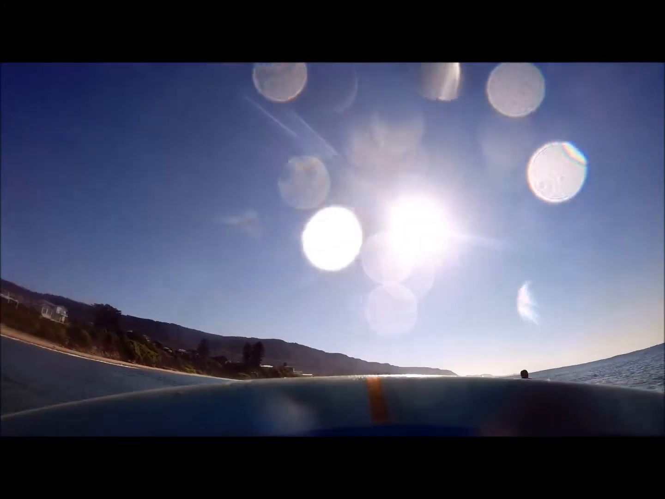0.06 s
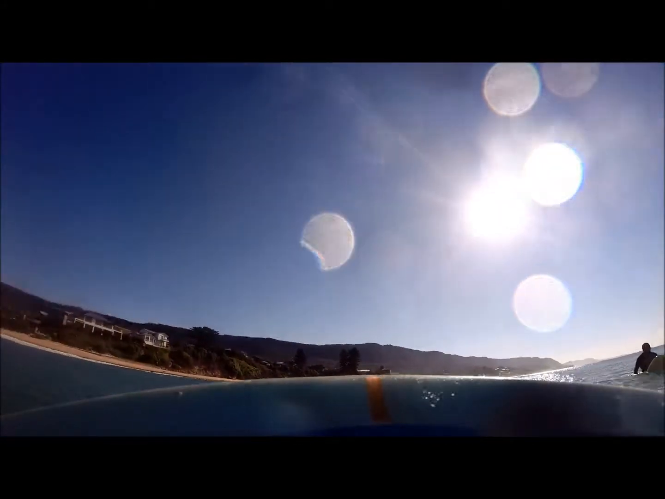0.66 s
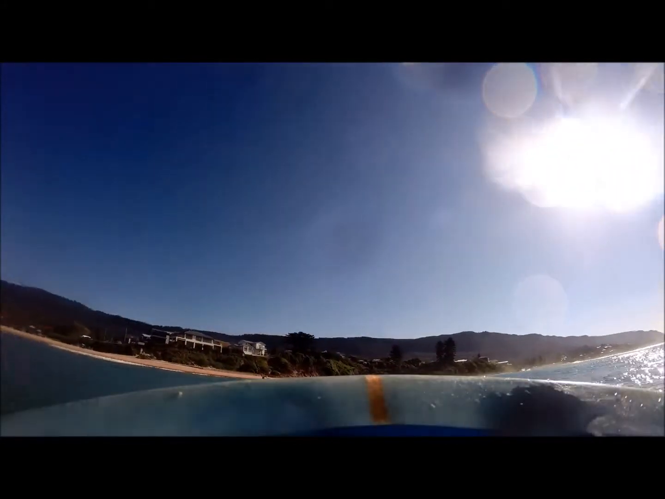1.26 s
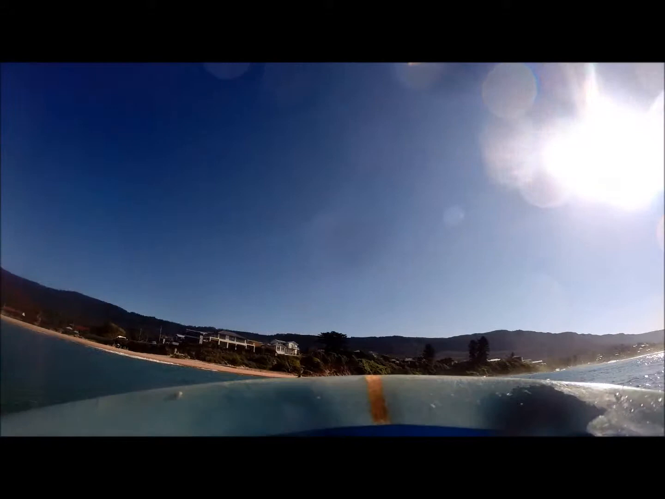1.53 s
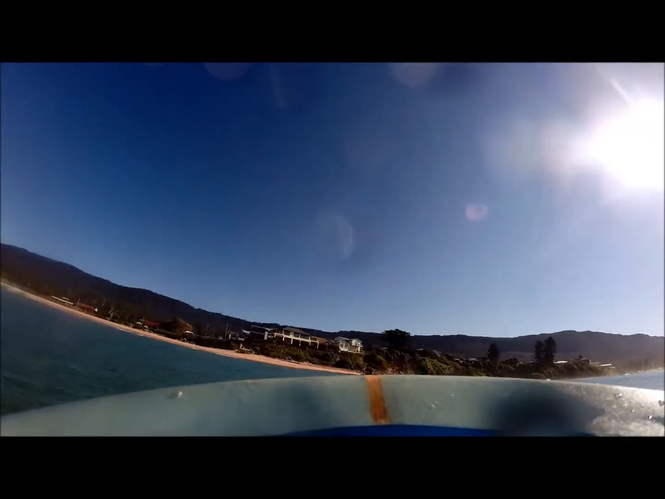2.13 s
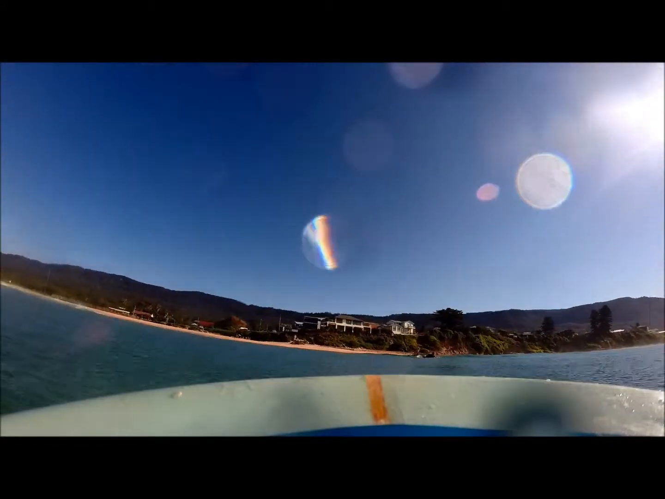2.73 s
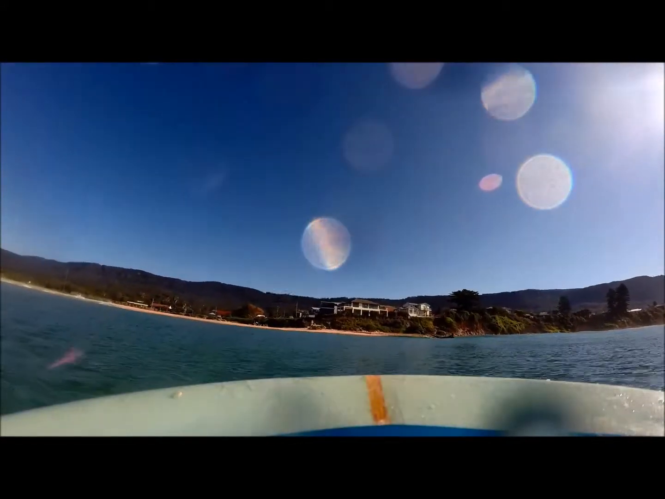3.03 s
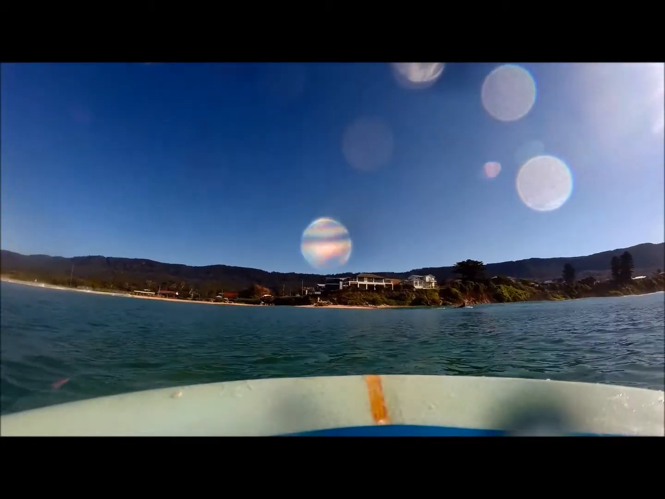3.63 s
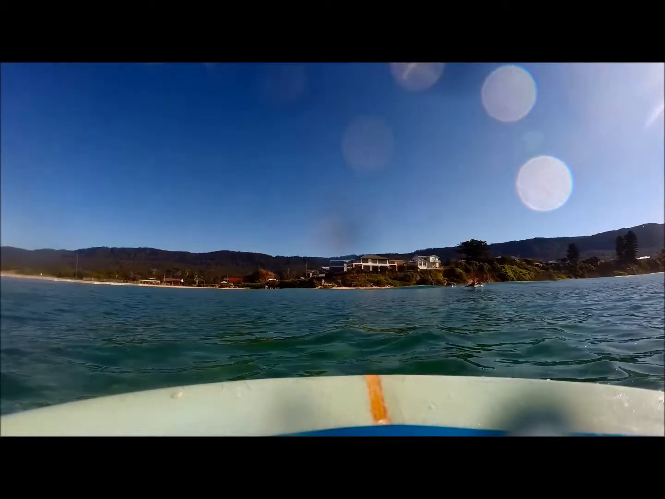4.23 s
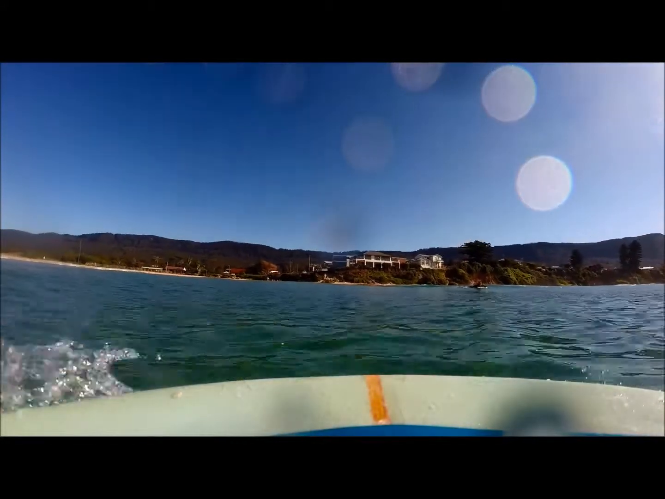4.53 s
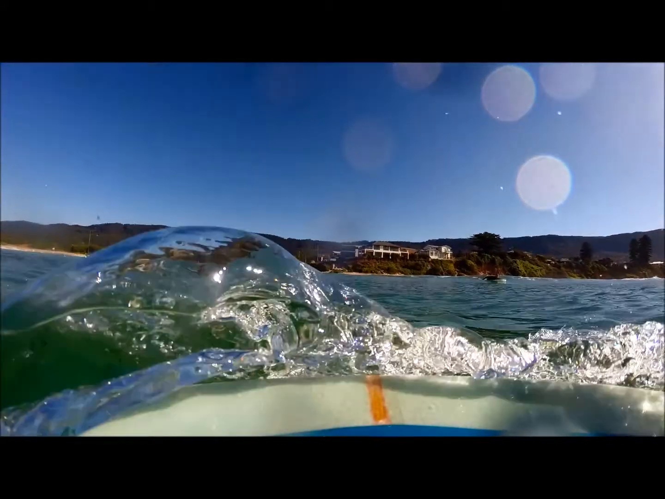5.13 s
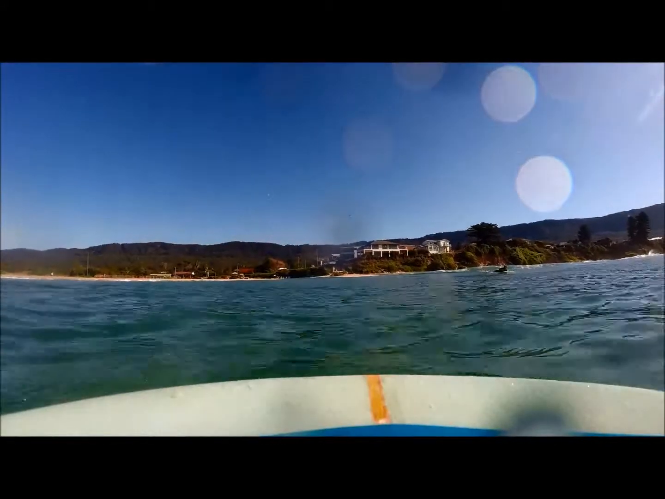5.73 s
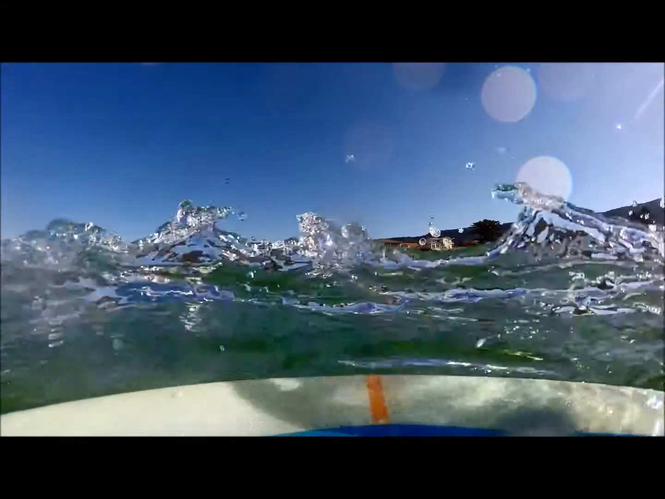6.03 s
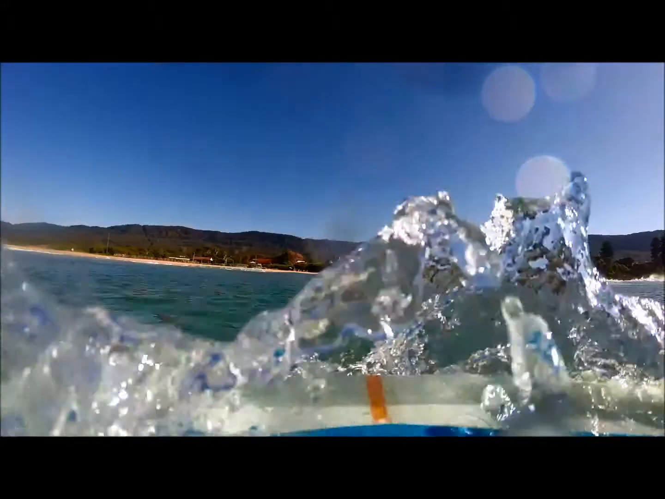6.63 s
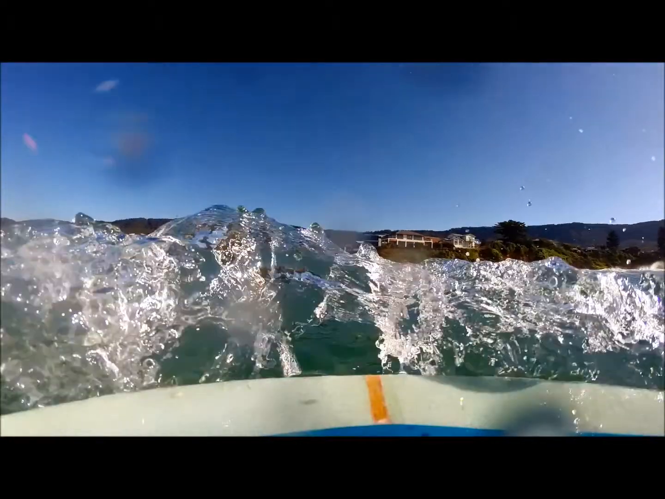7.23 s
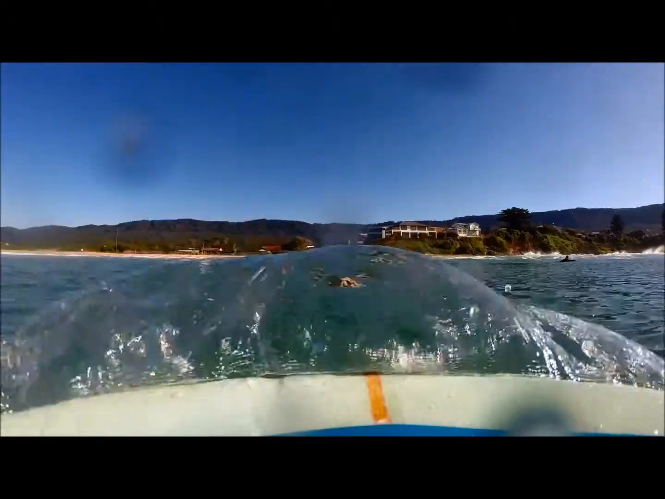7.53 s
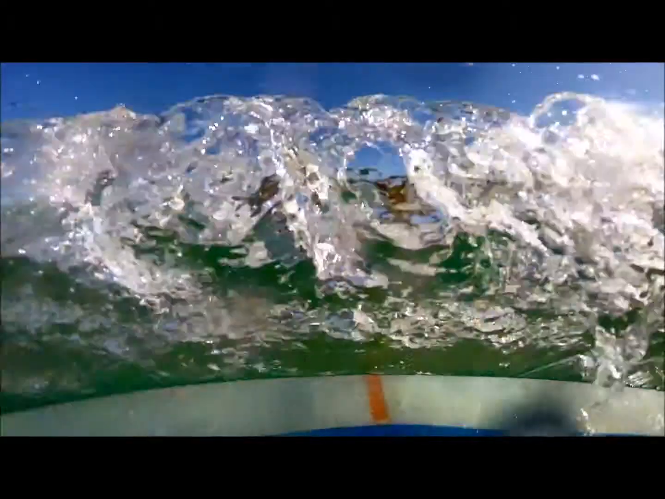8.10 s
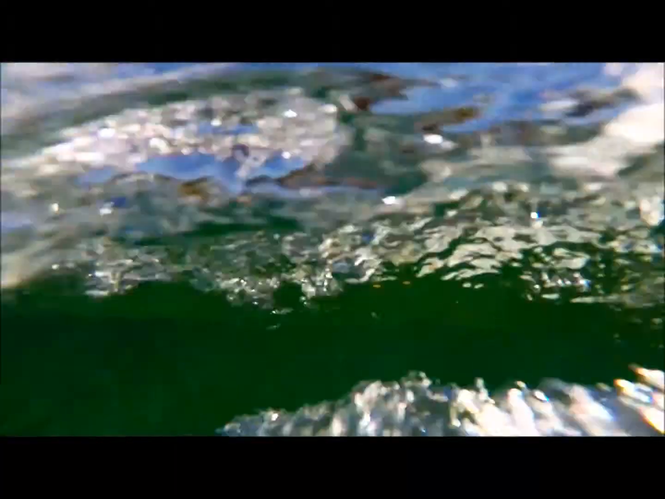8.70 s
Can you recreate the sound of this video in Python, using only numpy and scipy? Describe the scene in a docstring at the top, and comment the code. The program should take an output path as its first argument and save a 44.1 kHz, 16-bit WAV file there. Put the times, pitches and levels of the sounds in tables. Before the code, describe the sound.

Muffled sloshing, plops and plinking drops around a surfboard, with low shuddering underneath and a final fizzing wave.

```python
"""Choppy sea water slaps and gurgles against a paddled surfboard, heard by a camera on the board's nose.
Each wave builds, holds and drains. The air it traps rings as bubbles: big ones gurgle and plop,
small ones plink in the spray, all muffled by the camera's waterproof housing.
Underneath, the board and the camera mount shudder with a deep rumble as they ride over a small swell.
Near the end a wave smacks the housing and washes over it, fizzing."""
import sys
import numpy as np
from scipy import signal
from scipy.fft import rfft, irfft
from scipy.io import wavfile
from scipy.ndimage import uniform_filter1d, minimum_filter1d

SR = 44100
rng = np.random.default_rng(int(sys.argv[2]) if len(sys.argv) > 2 else 0)


def generate_wav(signal):
    """Clip the signal to [-1, 1] and save it as 16-bit WAV at the path in sys.argv[1]."""
    frames = np.transpose(np.atleast_2d(signal))
    scaled = np.clip(frames, -1, 1) * 32767
    pcm = np.round(scaled).astype(np.int16)
    wavfile.write(sys.argv[1], SR, pcm)


N = 386316

# In the tables, t is the time, f the frequency, and ring the time a sound takes to fade by 60 dB.
# pitch at which board and mount flex: t/s, f/Hz
SHUDDER_PITCH = [(0.0, 43.25), (2.5, 41.5), (2.9, 45), (5.81, 44.26), (6.78, 38.55), (7.12, 42.1)]
# steady shaking of board and mount: t/s, level/dB
SHAKING = [(0, -32.5), (.65, -27), (1.2, -29), (1.3, -40.5), (1.8, -35), (2.3, -29.5), (2.5, -15.5),
           (3, -22), (4.28, -23), (4.45, -35.5), (5, -25.5), (6.2, -22.5), (7.45, -24), (8.4, -20.5),
           (8.76, -28)]
# bumps that set the board swinging: t/s, hold/s, level/dB
JOLTS = [(0.499, 0.06, -21.5), (2.627, 0.052, -10.5), (2.741, 0.13, -7), (3.427, 0.025, -10.5),
         (3.538, 0.05, -16), (3.841, 0.087, -20), (4.708, 0.045, -17), (5.153, 0.098, -20),
         (5.49, 0.03, -12), (5.663, 0.044, -14.5), (5.887, 0.045, -12), (6.046, 0.013, -13.5),
         (6.61, 0.038, -11.5), (6.806, 0.033, -13.5), (7.176, 0.037, -9.5), (7.588, 0.021, -16.5),
         (7.759, 0.04, -11.5), (7.877, 0.017, -12), (8.247, 0.03, -14)]
# faint clicks during the strongest rumble: t/s
CLICK_TIMES = [2.741, 2.753, 2.777, 2.793, 2.805, 2.826, 2.839, 2.848, 2.861, 2.9]

# tone of each sound, meaning how strong its low and high parts are: f/Hz, relative level/dB
BUFFET_TONE = [(10, -14.5), (22, -0.5), (36, 4), (58, 3.5), (78, -3.5), (110, -29), (500, -120)]  # wind and chop pushing on the board
CLICK_TONE = [(500, -4), (2000, 0), (4500, -17), (7000, -50)]
THUD_TONE = [(35, -15), (60, 1), (100, -3.5), (165, -4), (230, -27), (1200, -120)]
GURGLE_TONE = [(110, -32.5), (185, 0), (210, 0.5), (263, -7), (339, -2.5), (430, -8), (560, -25),
               (950, -120)]
SPLASH_TONE = [(320, -22.5), (540, -1), (830, 1.5), (924, -5), (1010, -4), (1180, -7), (1360, -6.5),
               (1450, -16.5), (1880, -29.5), (3190, -120)]
DROPLET_TONE = [(920, -35), (1560, -2), (1650, -2.5), (1770, -11), (1960, -11), (2150, -7.5), (2250, -7.5),
                (2600, -18.5), (2760, -19), (2950, -15), (3430, -27), (3750, -29.5), (4880, -56.5),
                (8250, -120)]
FIZZ_TONE = [(2180, -38.5), (3700, -3), (4150, -12), (4910, -8), (5710, -16), (6700, -18), (7500, -29),
             (9750, -54.5), (16500, -120)]
ON_HOUSING_TONE = [(1060, -42), (1800, 15), (2040, -5.5), (3010, 2.5), (3730, -10.5), (4080, -12.5),
                   (6540, -24), (7500, -25), (9750, -75.5), (16500, -120)]  # water right on the housing

# restless sea between the waves: t/s, chop level/dB, droplet level/dB, fizz level/dB
RESTLESS_SEA = [(0, -52.5, -63.5, -78), (1.2, -42, -59.5, -75.5), (2.4, -43.5, -60.5, -75.5),
                (2.9, -41, -61, -86.5), (3.7, -40, -58, -82.5), (4.9, -37, -55.5, -76),
                (5.35, -39.5, -50, -71), (6.25, -41.5, -56.5, -74), (6.7, -35, -43, -68),
                (7.6, -36, -48, -70.5), (8.3, -42.5, -47.5, -68.5), (8.76, -32, -45, -45.5)]
# handfuls of water landing nearby: t/s, hold/s, droplet level/dB, fizz level/dB
SPATTERS = [(0.128, 0.021, -53.5, -80), (0.697, 0.25, -62, -72), (1.913, 0.011, -43, -72),
            (2.224, 0.0087, -44.5, -74), (2.44, 0.038, -44, -73), (2.532, 0.016, -41, -72.5),
            (3.166, 0.017, -53, -67), (4.029, 0.016, -46, -84), (4.244, 0.022, -44, -60),
            (4.65, 0.013, -36, -59), (4.935, 0.025, -47.5, -68), (5.63, 0.023, -34.5, -51),
            (5.871, 0.022, -50, -57), (6.508, 0.031, -36.5, -54), (6.95, 0.05, -42, -50.5)]
# single drops hitting the housing: t/s, level/dB, f/Hz
DROP_TICKS = [(3.801, -29, 1640), (4.035, -33.5, 1640), (4.559, -45, 4630), (5.318, -39, 3800),
              (5.403, -35, 1980), (5.4937, -35.5, 4800), (5.534, -29.5, 2940), (5.6, -25, 2240),
              (5.625, -22, 2230), (5.6466, -31, 3600), (5.663, -29, 6550), (5.8815, -40, 4930),
              (5.936, -29, 2070), (6.0278, -39, 4330), (6.517, -23, 2240), (6.5314, -30, 3200),
              (6.692, -27.5, 2240), (6.7567, -24.5, 2190), (6.9009, -21, 2330), (6.912, -25.5, 3020),
              (6.971, -15.5, 2130), (6.997, -22, 2930), (7.046, -18.5, 1600), (7.1244, -22, 2360),
              (7.172, -20.5, 2160), (7.356, -31.5, 2500), (7.6437, -30.5, 3056), (7.7425, -24, 2240),
              (7.761, -21.5, 2240), (7.793, -27.5, 3070), (7.841, -27.5, 3080), (7.9401, -18, 1600),
              (7.9884, -16.5, 1620), (7.995, -25, 2160), (8.062, -29.5, 2330)]
# water sliding along the board's edge over a shrinking hollow: t/s, length/s, first f/Hz, last f/Hz,
# level/dB
SLURPS = [(0.575, 0.16, 498, 715, -32), (0.693, 0.27, 200, 362.4, -31.5), (3.248, .14, 468, 590, -25),
          (7.408, 0.074, 197, 227, -21)]
# small waves lapping against the board; the last three rows are the splash of the wave smacking the housing:
# t/s, level/dB, ring/s
LAPS = [(0.125, -35, 0.1), (0.468, -37.5, 0.22), (1.444, -39.5, 0.24), (1.623, -40.5, 0.29),
        (1.887, -38, 0.19), (1.982, -30, 0.088), (2.047, -31.5, 0.22), (2.133, -29.5, 0.16),
        (2.292, -26, 0.29), (2.427, -19, 0.3), (2.541, -18, 0.13), (4.06, -21.5, 0.05), (4.185, -25, 0.43),
        (4.343, -24, 0.11), (4.557, -24, 0.12), (4.634, -21, 0.055), (5.461, -28, 0.19),
        (6.685, -29.5, 0.13), (8.106, -22.5, 0.078), (8.4825, -12, .025), (8.505, -31, .022),
        (8.744, -22.5, 0.055)]
# pockets of air trapped by slaps and falling drops: t/s, level/dB, f/Hz, ring/s
AIR_POCKETS = [(1.484, -24.5, 220, 0.22), (1.7875, -23.5, 368, 0.044), (1.89, -21, 864, 0.22),
               (2.137, -22, 1323, .09), (2.3431, -10.5, 204, 0.018), (2.864, -24, 774, 0.042),
               (3.2047, -18.5, 227, 0.18), (3.5176, -10, 205, 0.17), (3.575, -13, 907, 0.055),
               (4.0643, -10, 714, 0.12), (4.3475, -7.5, 867, 0.031), (4.558, -17, 396, 0.16),
               (4.56, -17, 1265, 0.079), (4.6378, -6, 750, 0.028), (4.658, -7.5, 1003, 0.054),
               (4.7489, -10, 315, 0.12), (5.0743, -20.5, 681, 0.086), (5.233, -15.5, 870, 0.055),
               (5.36, -16, 357, 0.094), (5.378, -14, 741, 0.061), (5.4732, -4.5, 386, 0.027),
               (5.4843, -11, 682, 0.098), (5.53, -8.5, 1096, 0.024), (5.6966, -13.5, 860, 0.027),
               (5.7225, -14, 254, 0.045), (5.7716, -4.5, 1120, 0.025), (5.8855, -9, 966, 0.041),
               (5.938, -8, 1064, 0.029), (6.683, -14.5, 323, 0.058), (6.827, -9.5, 1213, 0.03),
               (6.9699, -3.5, 870, 0.018), (7.089, -13, 306, 0.15), (7.133, -6.5, 292, 0.093),
               (7.1392, -6.5, 734, 0.063), (7.527, -15, 747, 0.062), (7.7555, -9, 726, 0.0224),
               (7.9057, -5, 825, 0.057), (7.956, -5.5, 1320, 0.033), (8.1063, -9.5, 810, 0.074),
               (8.3454, -15, 334, 0.23), (8.4228, -10, 280, 0.091), (8.483, 1, 703, 0.022),
               (8.506, -1.5, 850, 0.01), (8.5666, -13, 820, 0.024), (8.577, -11.5, 333, 0.031),
               (8.6172, -3.5, 1220, 0.02), (8.625, -7, 1018, 0.057)]
# a wave hitting the housing itself: t/s, level/dB
SMACKS = [(8.4824, -11.5), (8.505, -30.5)]
# notes the housing rings with when hit: f/Hz, relative level/dB, ring/s
HOUSING_NOTES = [(1665, 3.5, 0.026), (2275, 18, 0.0072), (3540, 3, 0.0082)]
# how bright the splashes are: t/s, brightness (higher means more treble and less bass)
BRIGHTNESS = [(0, 1), (2.2, 0.5), (2.45, -5), (3.2, 1.5), (3.6, 5), (5.5, 5), (7, 7.5), (8.4, 12.5),
              (8.6, 31)]
# the swell punching the underside of the board: t/s, hold/s, level/dB
THUMPS = [(2.53, 0.064, -22), (3.1, 0.028, -34), (4.655, 0.035, -25), (5.474, 0.012, -25.5),
          (6.655, 0.035, -27), (7.933, 0.017, -20), (8.522, 0.04, -28)]
# waves surging against the board: crest t/s, rise/s, hold/s, fall/s, gurgle level/dB, splash level/dB,
# droplet level/dB
WAVES = [(0.0, .1, 0.025, 0.89, -34, -34, -57.5), (0.515, 0.09, 0.23, 0.18, -33.5, -38.5, -65),
         (0.814, 0.13, 0.22, 0.072, -32.5, -34.5, -56), (1.535, 0.035, 0.04, 0.36, -37, -46, -59.5),
         (1.978, 0.3, 0.34, 0.23, -32.5, -38.5, -69), (2.34, 0.072, 0.056, .1, -24.5, -32.5, -50.5),
         (2.433, 0.036, 0.049, 0.018, -15.5, -14.5, -44), (2.525, 0.025, 0.031, 0.042, -15.5, -22, -51),
         (2.614, 0.054, 0.19, 0.099, -25, -32.5, -61), (3.126, 0.036, 0.4, .15, -31.5, -35, -64),
         (3.511, 0.28, 0.056, 0.084, -23.5, -22.5, -44), (3.81, 0.083, 0.023, 0.15, -30, -31.5, -56),
         (4.075, 0.085, 0.22, 0.14, -29.5, -27.5, -49), (4.23, 0.096, 0.051, 0.26, -23, -24.5, -49),
         (4.579, 0.037, 0.032, 0.13, -27.5, -32, -50), (4.651, 0.053, 0.12, 0.049, -23.5, -25, -49),
         (5.472, 0.13, 0.053, 0.57, -28, -30.5, -42.5), (5.775, 0.12, 0.022, 0.11, -17, -19.5, -40.5),
         (5.895, 0.078, 0.066, 0.12, -22.5, -19, -37), (6.694, 0.019, 0.18, 0.12, -24.5, -30, -51),
         (6.934, 0.11, 0.13, 0.14, -26, -21, -33.5), (7.108, 0.15, 0.069, 0.081, -20, -17, -35),
         (7.27, 0.25, 0.059, 0.15, -26.5, -31, -45.5), (7.857, 0.17, 0.021, 0.31, -23, -17.5, -32.5),
         (7.936, 0.034, 0.045, 0.15, -17.5, -16, -42), (8.07, 0.083, 0.045, 0.1, -22.5, -22.5, -36),
         (8.407, 0.11, 0.17, 0.078, -27, -33.5, -38.5), (8.757, 0.054, .02, 0.13, -27, -30, -25.5)]


def gain_of(db):
    """Turns decibels into a number to multiply a sound by."""
    return 10 ** (np.asarray(db) / 20)


def unit_level(x):
    """Scales a signal so that its average strength (rms) is 1."""
    return x / np.sqrt(np.mean(x ** 2) + 1e-20)


def curves(rows):
    """Joins the points of a time table with straight lines, giving one curve per column."""
    times, *columns = np.transpose(rows)
    return [np.interp(np.arange(N) / SR, times, column) for column in columns]


def add(mix, start, sound):
    """Mixes a sound in, beginning at start seconds."""
    part = mix[max(round(start * SR), 0):][:len(sound)]
    part += sound[:len(part)]


def coloured(x, tone):
    """Gives a sound a tone and an rms of 1. The filter never rings ahead of a hit, so hits stay sharp."""
    hz, db = np.transpose(tone)
    log_hz = np.log(abs(np.fft.fftfreq(4096, 1 / SR)) + 1)
    log_gain = np.log(gain_of(np.interp(log_hz, np.log(hz), np.maximum(db, -120))))
    taps = np.fft.ifft(np.exp(np.conj(signal.hilbert(log_gain)))).real
    return unit_level(signal.oaconvolve(x, taps[:len(taps) // 2])[:N])


def noise(tone):
    """A rushing noise with the given tone."""
    return coloured(rng.standard_normal(N), tone)


def wander(hz):
    """A random drift of rms 1, about as fast as hz."""
    t = np.arange(N) / SR
    coarse_t = np.arange(0, t[-1] + 1, 1 / 1000)
    f = np.fft.rfftfreq(len(coarse_t), coarse_t[1])
    spectrum = rfft(rng.standard_normal(len(coarse_t))) * np.exp(-(f / hz) ** 2)
    return unit_level(np.interp(t, coarse_t, irfft(spectrum, len(coarse_t))))


def steadied(x, window):
    """Evens out loudness changes slower than window samples and keeps the fine grain."""
    power = uniform_filter1d(uniform_filter1d(abs(x) ** 2, window), window)
    return x / np.sqrt(abs(power) + 1e-9)


def swells(floor_db, events):
    """Level in dB of events (t/s, rise/s, hold/s, fall/s, level/dB) over a floor; slopes span 20 dB."""
    t = np.arange(0, N, 32) / SR
    power = 0
    for crest, rise, hold, fall, db in events:
        drop_db = 20 * (np.maximum(crest - t, 0) / rise + np.maximum(t - crest - hold, 0) / fall)
        power += gain_of(db - drop_db) ** 2
    return 10 * np.log10(gain_of(floor_db) ** 2 + np.interp(np.arange(N) / SR, t, power))


def bubble(hz, ring_s, rise):
    """A pocket of air starts ringing within one cycle and climbs in pitch as it nears the surface."""
    t = np.arange(int(1.2 * ring_s * SR) + 8) / SR
    swing = (1 - np.exp(-(2 * t * hz) ** 2)) * gain_of(-60 * t / ring_s)
    return swing / swing.max() * np.sin(2 * np.pi * hz * (t + rise * t * t / (2 * ring_s)))


def froth(tone, low_hz, high_hz, per_s, cycles, spread_db, rush_db, churn_db, churn_hz, window):
    """Bubbles of many sizes ring over the rush of the water; churning makes the level flutter."""
    swarm, sizes = np.zeros(N), 32
    for hz in np.geomspace(low_hz, high_hz, sizes):
        when, strength, chance = rng.random((3, 1000))
        gains = hz * gain_of(spread_db * np.minimum(-np.log(1 - strength), 4))  # a few are much louder
        born = chance < per_s * N / SR / sizes / len(chance)
        ring = bubble(hz, cycles / hz * rng.uniform(0.39, 2.15), rise=0.12)
        for start, gain in zip(when[born] * N / SR, gains[born]):
            add(swarm, start, gain * ring)
    water = unit_level(swarm) + gain_of(rush_db) * rng.standard_normal(N)
    churn = gain_of(churn_db * wander(churn_hz))
    return steadied(coloured(water * churn, tone), window)


def patter(tone, per_s, spread_db):
    """Fine drops strike the housing at random moments: many small, a few large."""
    strength = gain_of(spread_db * np.minimum(rng.exponential(1, N), 3))
    hits = rng.random(N) < per_s / SR
    return coloured(strength * hits, tone)


def dull_or_bright(splash, split_hz=950):
    """Big smothered splashes are dull; thin sheets of water breaking close by are bright."""
    low = signal.sosfiltfilt(signal.butter(3, split_hz, fs=SR, output="sos"), splash)
    (brightness,) = curves(BRIGHTNESS)
    return low * gain_of(-0.3 * brightness) + (splash - low) * gain_of(0.41 * brightness)


def faint_clicks():
    """Faint, quick clicks are heard during the strongest rumble."""
    clicks = np.zeros(N)
    for start, strength in zip(CLICK_TIMES, rng.uniform(0.4, 1, (len(CLICK_TIMES), 1))):
        add(clicks, start, strength)
    return gain_of(-77) * coloured(clicks, CLICK_TONE)


def board_shudder(jolt_rise_s=0.098, jolt_fall_s=0.12, sway_hz=9.05):
    """Board and mount flex at one low pitch; shaking keeps them swinging and bumps make it swell."""
    (shaking_db,) = curves(SHAKING)
    (hz,) = curves(SHUDDER_PITCH)
    jolts = [(start, jolt_rise_s, hold, jolt_fall_s, db) for start, hold, db in JOLTS]
    sway = steadied(wander(sway_hz) + 1j * wander(sway_hz), window=2800)  # strength and timing drift
    flex = np.sqrt(2) * (sway * np.exp(2j * np.pi * np.cumsum(hz) / SR)).real
    buffet = steadied(noise(BUFFET_TONE), window=3000)
    return gain_of(swells(shaking_db, jolts)) * (flex + gain_of(-10.5) * buffet)


def fade_to_hiss(sound, tone, level_db, quiet_db):
    """Plays spray at level_db; as it sinks below quiet_db, a smooth hiss with little treble takes over."""
    hiss_share = 1 / (1 + gain_of(level_db - quiet_db) ** 2)
    hiss = signal.sosfilt(signal.butter(4, 5000, fs=SR, output="sos"), noise(tone))
    return gain_of(level_db) * (np.sqrt(1 - hiss_share) * sound + np.sqrt(hiss_share) * hiss)


def spray(spatter_rise_s=0.0082, spatter_fall_s=0.033):
    """Every wave and spatter throws droplets, whose tiny bubbles plink, and leaves foam that fizzes."""
    _, sea_droplet_db, sea_fizz_db = curves(RESTLESS_SEA)
    thrown = [(*shape, db, db - 24) for *shape, _, _, db in WAVES]  # fizz is weaker than the droplets
    thrown += [(start, spatter_rise_s, hold, spatter_fall_s, *levels) for start, hold, *levels in SPATTERS]
    droplet_db = swells(sea_droplet_db, [(*shape, db) for *shape, db, _ in thrown])
    fizz_db = swells(sea_fizz_db + 3.5, [(*shape, db) for *shape, _, db in thrown])
    droplets = froth(DROPLET_TONE, 1600, 3750, per_s=900, cycles=38, spread_db=4,
                     rush_db=-1, churn_db=2.8, churn_hz=50, window=3600)
    fizz = froth(FIZZ_TONE, 3700, 7500, per_s=280, cycles=76, spread_db=3,
                 rush_db=3.5, churn_db=1.5, churn_hz=90, window=3600)
    fizz = unit_level(fizz + gain_of(-3) * patter(FIZZ_TONE, per_s=84, spread_db=4.5))
    return (fade_to_hiss(droplets, DROPLET_TONE, droplet_db, quiet_db=-58)
            + fade_to_hiss(fizz, FIZZ_TONE, fizz_db, quiet_db=-71))


def drop_ticks(ring_cycles=46, click_db=-20.5):
    """A drop landing on the housing gives a sharp click and a very short, high ping."""
    pings, clicks = np.zeros(N), np.zeros(N)
    t = np.arange(SR // 20) / SR
    for start, db, hz in DROP_TICKS:
        add(pings, start, gain_of(db) * bubble(hz, ring_cycles / hz, rise=0.06))
        add(clicks, start, gain_of(db + click_db) * np.exp(-t / 0.0015))
    return pings + clicks * steadied(noise(ON_HOUSING_TONE), window=60)


def slurps(width_per_pitch=0.42):
    """Rushing water sounds a leaky hollow, whose breathy pitch rises as it fills."""
    out = np.zeros(N)
    for start, length, first_hz, last_hz, db in SLURPS:
        samples = int(length * SR)
        rush = rng.standard_normal((2, SR))
        lowpass = signal.butter(2, width_per_pitch * first_hz / 2, fs=SR, output="sos")
        flutter = signal.sosfilt(lowpass, rush[0] + 1j * rush[1])[-samples:]
        glide = np.exp(2j * np.pi * np.cumsum(np.geomspace(first_hz, last_hz, samples)) / SR)
        fade = signal.windows.tukey(samples, 0.5)
        add(out, start, gain_of(db) * unit_level((flutter * glide).real) * fade)
    return out


def laps():
    """A small wave hits the board (or, at the end, the big wave hits the housing): a sudden splash that sheds
    three bubbles as it drains away."""
    force, bubbles = np.zeros(N), np.zeros(N)
    t = np.arange(SR // 3) / SR
    for start, db, ring_s in LAPS:
        add(force, start, gain_of(db - 60 * t / ring_s) * (1 - np.exp(-t / 0.0012)))
        for late, octaves in rng.random((3, 2)):
            ring = bubble(650 * 2 ** octaves, ring_s / 2, rise=0.22)
            add(bubbles, start + late * ring_s / 5, gain_of(db + 3) * ring)
    splash = dull_or_bright(steadied(noise(SPLASH_TONE), window=400))
    droplets = noise(DROPLET_TONE)
    return force * (gain_of(5) * splash + gain_of(-20.5) * droplets) + bubbles


def plops(wobble_s=0.00009, churn_db=2.5, churn_hz=142):
    """Trapped air rings and splits off smaller bubbles; churning water jostles their pitch and level."""
    rings, n = np.zeros(N), np.arange(N)
    for start, db, hz, ring_s in AIR_POCKETS:
        add(rings, start, gain_of(db) * bubble(hz, ring_s, rise=0.2))
        for late, smallness in rng.random((3, 2)):
            piece = bubble(hz * 1.5 ** smallness, ring_s / 3, rise=0.2)
            add(rings, start + late * ring_s / 4, gain_of(db - 15.5) * piece)
    wobbling = np.interp(n + wobble_s * SR * wander(churn_hz), n, rings)
    return wobbling * unit_level(gain_of(churn_db * wander(churn_hz)))


def wave_over_housing(foam_db=-40, growth_db_per_s=23.5):
    """A wave smacks the housing and rings it; foam crackles ever louder as the water closes over it."""
    force, ring = np.zeros(N), np.zeros(N)
    t = np.arange(SR // 20) / SR
    notes = sum(gain_of(db - 60 * t / ring_s) * np.sin(2 * np.pi * hz * t)
                for hz, db, ring_s in HOUSING_NOTES)
    for start, db in SMACKS:
        add(force, start, gain_of(db) * np.exp(-t / 0.0043))
        add(ring, start, gain_of(db) * notes)
    foam = froth(ON_HOUSING_TONE, 2060, 7300, per_s=1200, cycles=27, spread_db=6,
                 rush_db=-8, churn_db=4.5, churn_hz=80, window=2400)
    foam = unit_level(foam + gain_of(-6) * patter(ON_HOUSING_TONE, per_s=940, spread_db=3))
    since_smack_s = np.arange(N) / SR - SMACKS[0][0]
    foam_gain = (since_smack_s > 0) * gain_of(foam_db + growth_db_per_s * since_smack_s)
    crack = force * steadied(noise(ON_HOUSING_TONE), window=60)
    return ring + crack + foam_gain * foam


def sloshing_waves(thump_rise_s=0.029, thump_fall_s=0.1):
    """Big bubbles gurgle under the board, smaller ones splash where water breaks, and hard waves thud."""
    chop_db = curves(RESTLESS_SEA)[0] + 3 * wander(hz=29)  # the chop comes in separate licks
    gurgle_db = swells(chop_db + 2.5, [(*shape, db) for *shape, db, _, _ in WAVES])
    splash_db = swells(chop_db - 0.5, [(*shape, db) for *shape, _, db, _ in WAVES])
    gurgle = froth(GURGLE_TONE, 199.75, 450, per_s=200, cycles=31, spread_db=3.5,
                   rush_db=7, churn_db=1.2, churn_hz=40, window=1700)
    splash = froth(SPLASH_TONE, 484, 1514, per_s=400, cycles=22.8, spread_db=3.5,
                   rush_db=11, churn_db=2, churn_hz=60, window=1700)
    thud = steadied(noise(THUD_TONE), window=2400)
    thumps = [(start, thump_rise_s, hold, thump_fall_s, db) for start, hold, db in THUMPS]
    thud_db = swells(1.267 * gurgle_db + 0.5, thumps)  # grows faster than the gurgle
    return (gain_of(thud_db) * thud + gain_of(gurgle_db - 1.4) * gurgle
            + gain_of(splash_db) * dull_or_bright(splash))


def scene():
    """Board and water both reach one microphone inside the housing."""
    background = board_shudder() + faint_clicks()
    water = sloshing_waves() + spray() + laps() + plops() + drop_ticks() + slurps() + wave_over_housing()
    return (background + water)[None]


def record(dry, cutoff_hz=7700):
    """A fast limiter turns the hardest slaps down to full scale; then the highest treble is cut off."""
    safe_gain = minimum_filter1d(1 / np.maximum(abs(dry), 1), size=40)
    limited = dry * uniform_filter1d(safe_gain, size=40)
    lowpass = signal.firwin(511, cutoff_hz, window=("kaiser", 9), fs=SR)
    return signal.oaconvolve(limited, lowpass[None], "same")


dry = scene()
out = record(dry)
generate_wav(out)
```